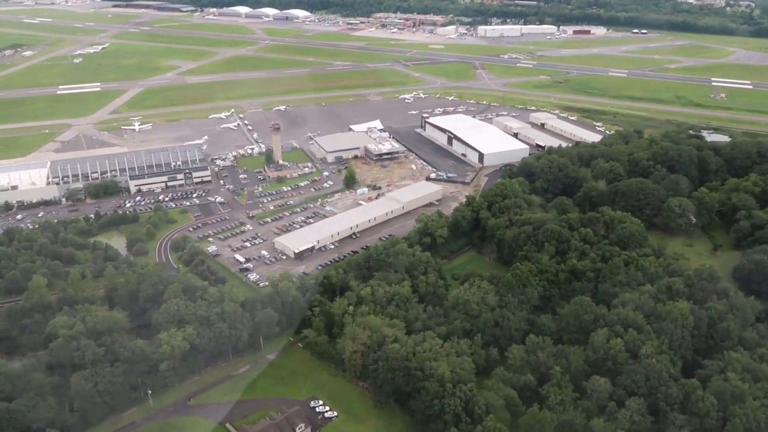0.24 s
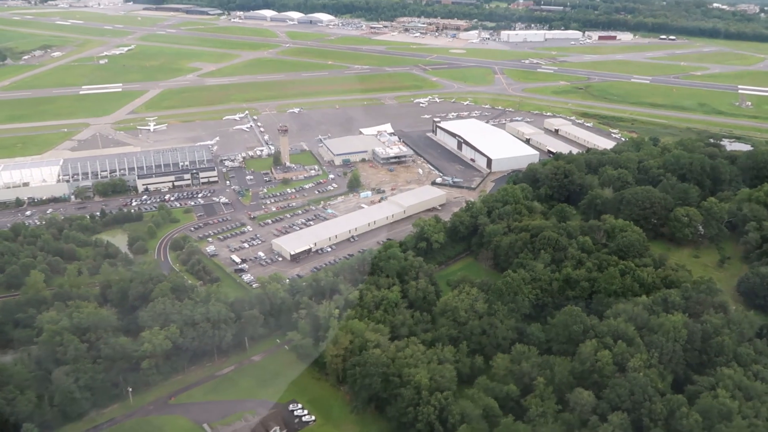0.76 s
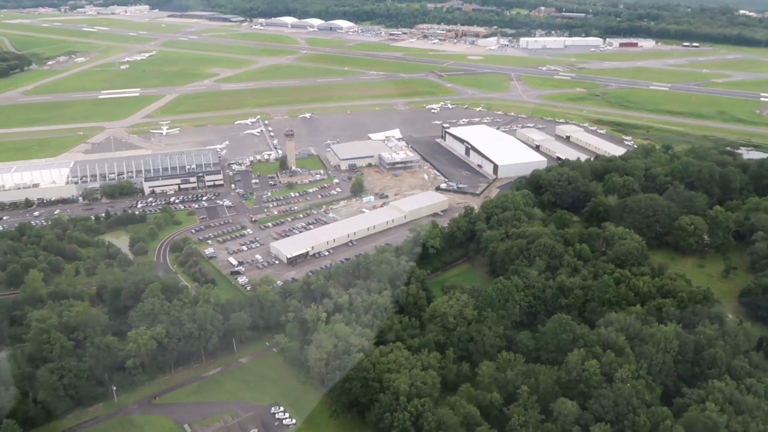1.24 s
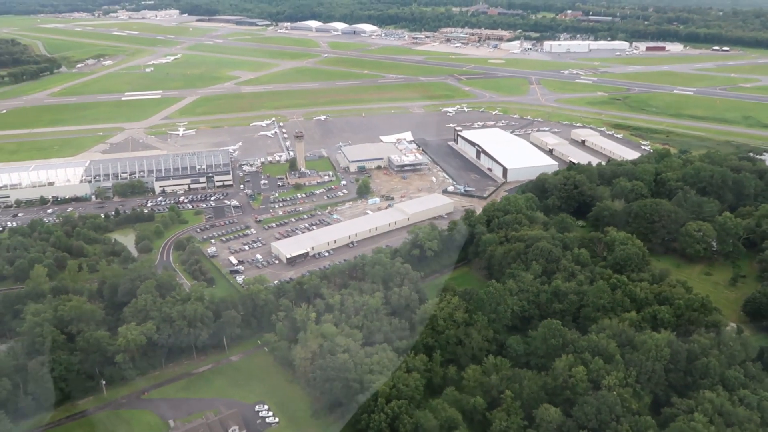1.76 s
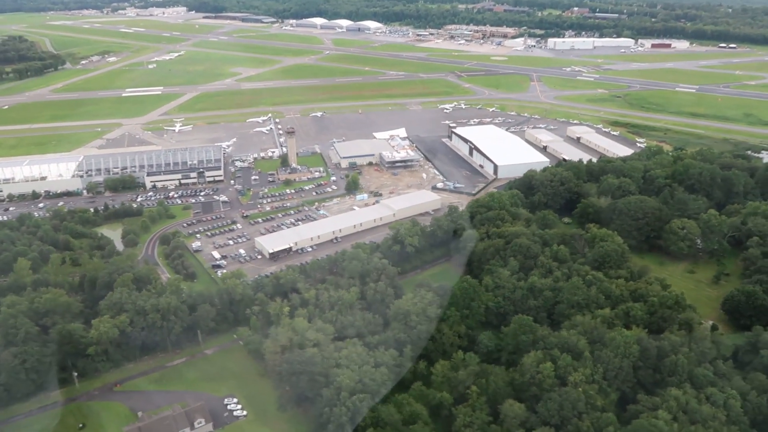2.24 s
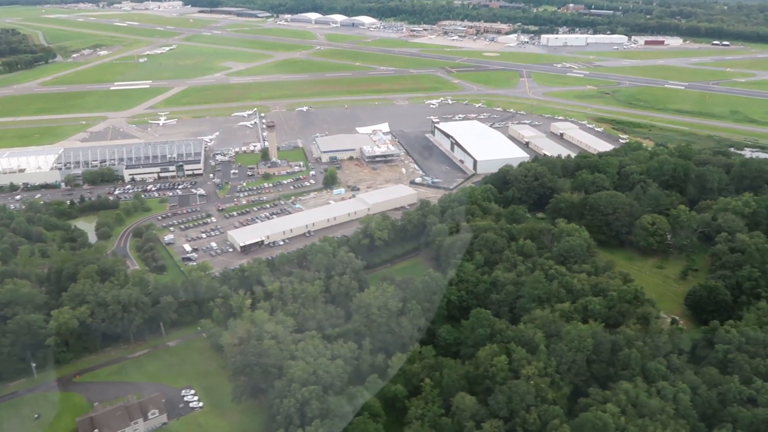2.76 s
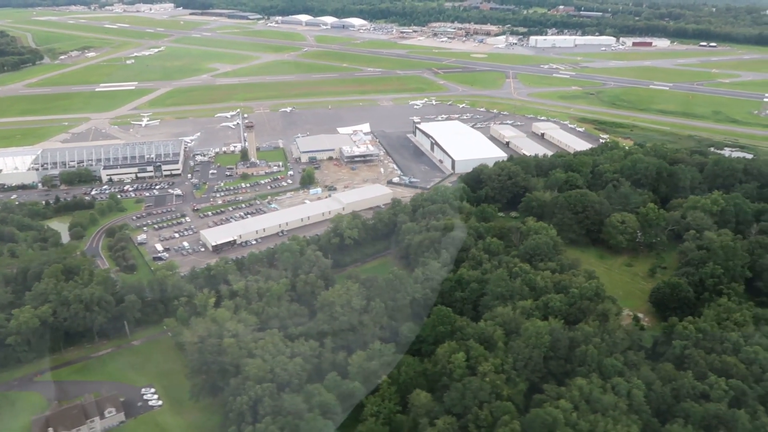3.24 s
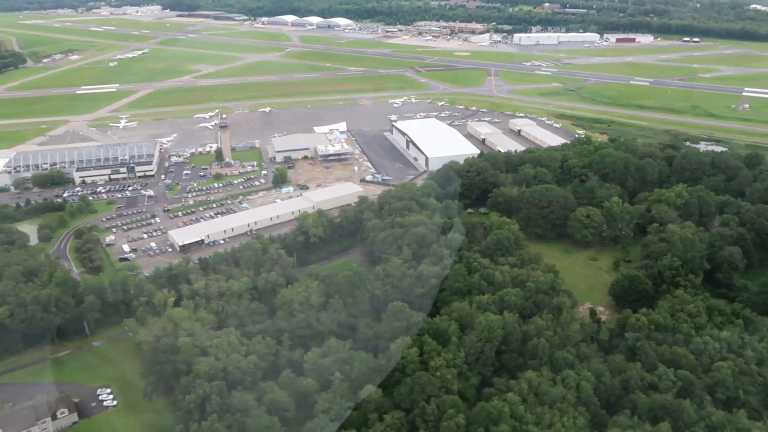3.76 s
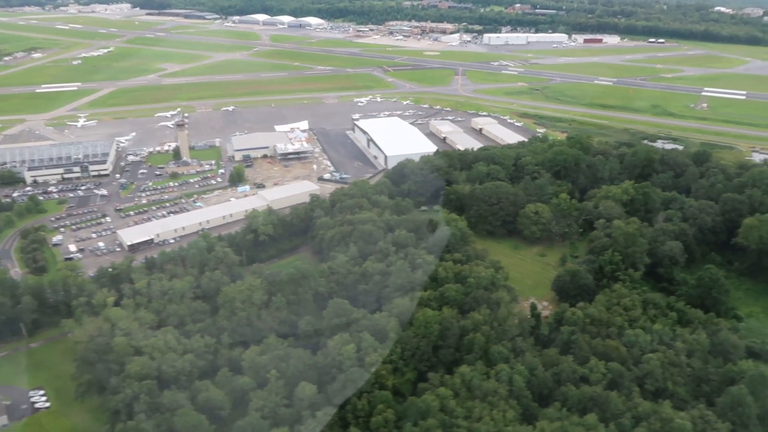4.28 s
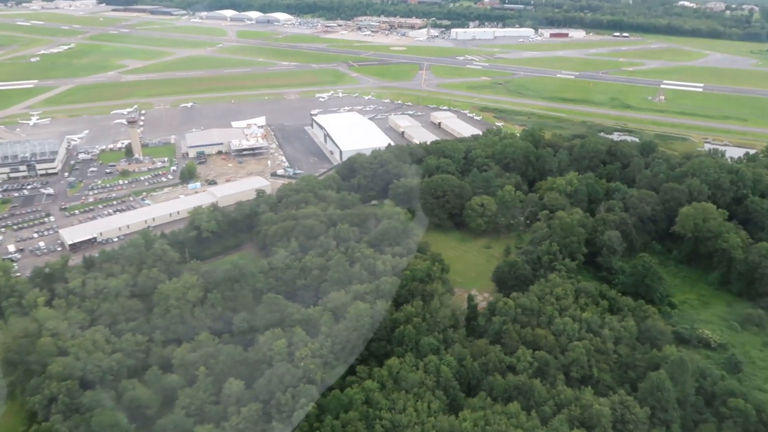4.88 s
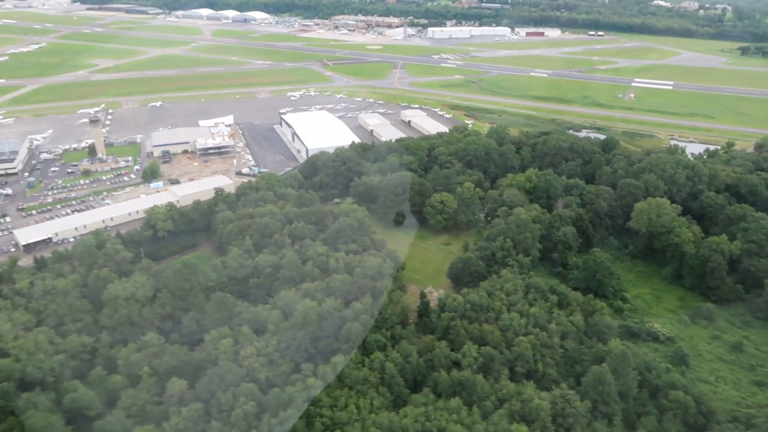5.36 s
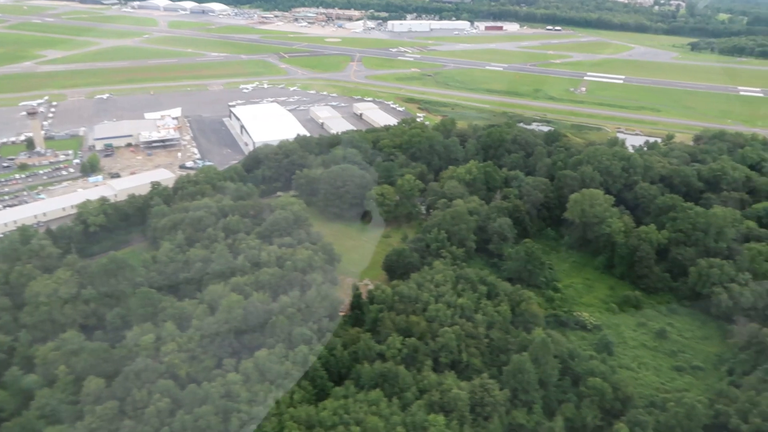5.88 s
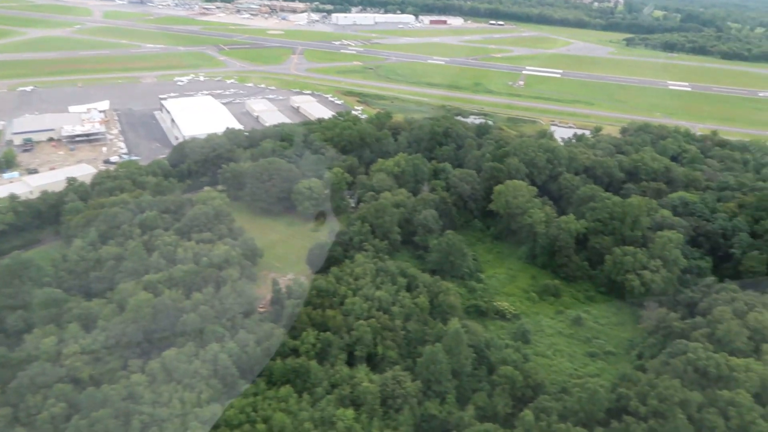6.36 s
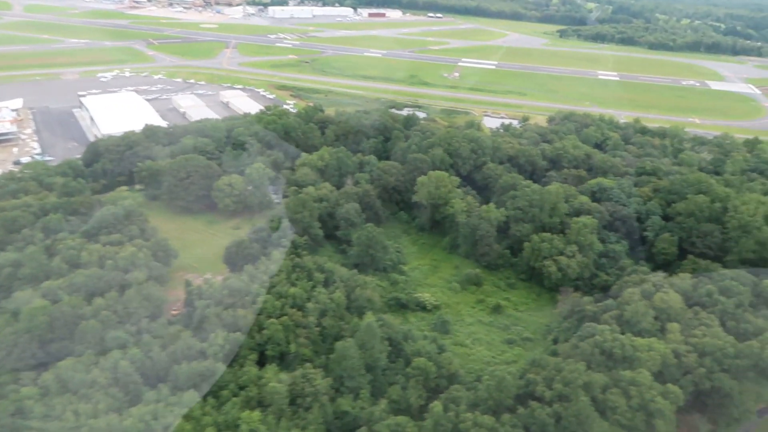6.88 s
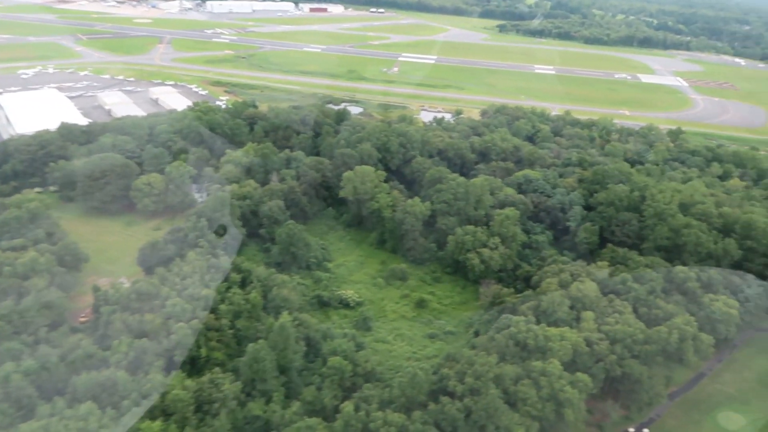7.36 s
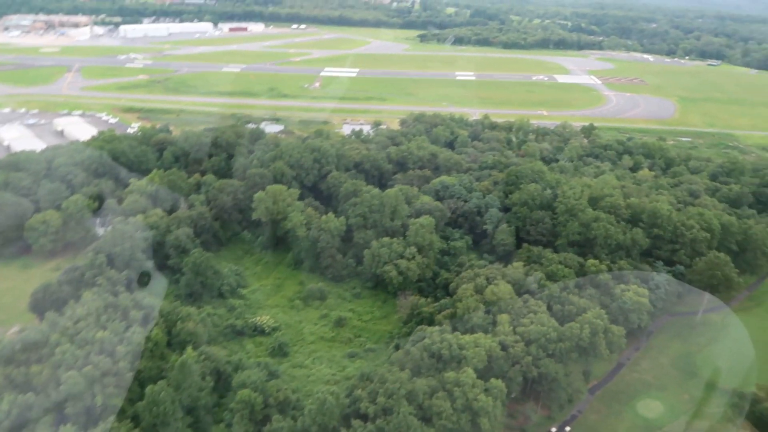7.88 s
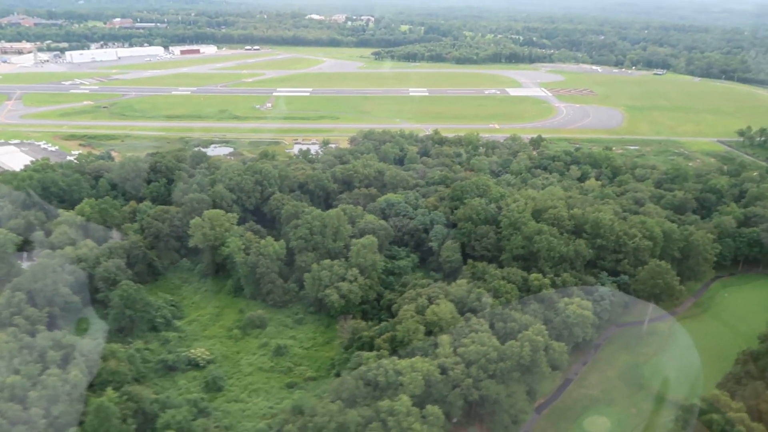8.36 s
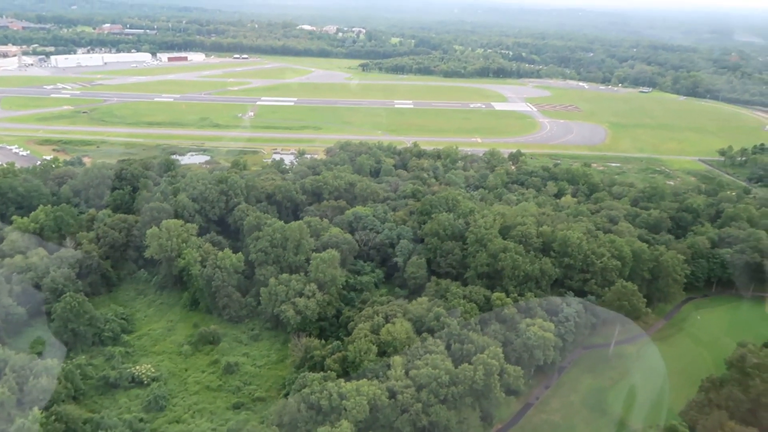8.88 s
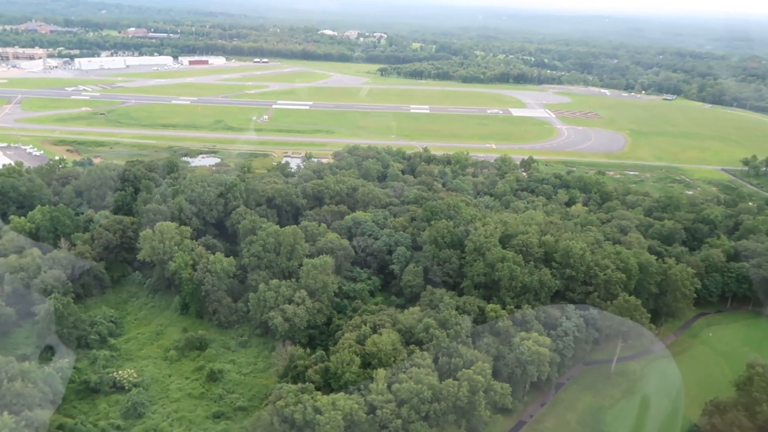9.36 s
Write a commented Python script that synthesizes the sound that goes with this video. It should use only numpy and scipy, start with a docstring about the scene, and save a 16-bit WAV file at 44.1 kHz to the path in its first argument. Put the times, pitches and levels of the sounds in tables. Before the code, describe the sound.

Close in-cabin sound of a two-blade turbine helicopter in steady flight. A heavy low drone near 100 and 160 hertz fills the space, throbbing about fourteen times a second, with broad air roar. A loose panel snaps and buzzes roughly seven times a second. Gear whine strengthens after two seconds, then fades; a higher whine rises near eight. Two soft booms of buffeting air come early and late.

```python
"""Two-blade turbine helicopter, cabin in flight

One drive shaft sets the speed of rotor thumps and slaps, tail rotor, gear meshes and gear whines: sine tones
at fixed multiples, plus clicks ringing cabin modes. The turbine whistle is a sine on its own pitch curve.
Air roars past the shell as filtered noise, swishing with every blade; buffets boom, then the level dips briefly.
A loose panel knocks once a rotor turn: a short suction pulse, then a buzz."""
import sys
import numpy as np
from scipy import signal
from scipy.fft import rfft, irfft, next_fast_len
from scipy.io import wavfile
from scipy.ndimage import uniform_filter1d

SR = 44100
rng = np.random.default_rng(int(sys.argv[2]) if len(sys.argv) > 2 else 0)


def bounce(signal):
    """Save signal as a 16-bit WAV file at the path given by the first command-line argument."""
    frames = np.transpose(np.atleast_2d(signal))
    limited = np.clip(frames, -1, 1)
    pcm = np.round(limited * 32767).astype(np.int16)
    wavfile.write(sys.argv[1], SR, pcm)


N = 424683

CRUISE_TURNS_PER_S = 100   # usual shaft speed
GEARS_START_CYCLES = .62   # phase shared by all shaft-driven tones, so their beats keep time

# Heavy buffets. Each row: boom peak time in seconds, boom peak in dB, level dip in dB, recovery in seconds.
BUFFETS = [(0.666, -11, -3, .15), (7.726, -13, -5, 0.16)]
# Light blade loading. Each row: time in seconds, share 0-1 of the light-load level change.
LIGHT_LOAD = [(0, 1), (2.4, 1), (4.4, .1), (9.63, 0.1)]


def from_db(db):
    """Decibels to gain."""
    return 10 ** (np.asarray(db) / 20)


def rms_one(x):
    """Scale to rms 1."""
    return x / np.sqrt(np.mean(x ** 2) + 1e-20)


def in_time(rows):
    """Columns of a curve table, one value per sample."""
    s, *columns = np.transpose(rows)
    return [np.interp(np.arange(N) / SR, s, column) for column in columns]


def at_hz(points, hz, axis=1):
    """Read a spectrum column on a log-frequency axis."""
    points = np.array(points)
    return np.interp(np.log(hz), np.log(points[:, 0]), points[:, axis])


def drift(rate):
    """Smooth random wander of rms about 1; a larger rate is quicker."""
    r = np.exp(-200 * np.pi * rate / SR)
    noise = rng.standard_normal(N // 100 + 1002)   # one value per 100 samples
    slow = signal.lfilter([1], [1, -2 * r, r * r], noise)[1000:]
    return np.interp(np.arange(N) / 100, np.arange(len(slow)), rms_one(slow))


def tone(cycles, level_db, pan_db=0, lead_rad=0):
    """A stereo sine on a running cycle count, level in dB rms; pan is left minus right, lead is the left's."""
    sides = np.array([[.5], [-.5]])
    gain = np.sqrt(2) * from_db(level_db + pan_db * sides)
    return gain * np.cos(2 * np.pi * cycles + lead_rad * sides)


def swell(at, sizes, hz, width_hz):
    """Clicks three times through one resonance: a soft swell and fall whose peak is near the click size."""
    out = np.full(N, 1e-18)
    out[np.clip(at, 0, N - 1)] = sizes
    r, w = np.exp(-2 * np.pi * width_hz / SR), 2 * np.pi * hz / SR
    for stage in range(3):
        out = signal.lfilter([np.sin(w)], [1, -2 * r * np.cos(w), r * r], out)
    return out * 2 * (np.e * (1 - r)) ** 2


def blows(turns, modes, spread_db, jitter_s):
    """One click per whole turn, uneven in strength and time, rings each mode; rms 1."""
    at = np.flatnonzero(np.diff(np.floor(turns)))
    chance = rng.standard_normal((len(at), 1 + len(modes)))
    at = at + (jitter_s * SR * chance[:, 0]).astype(int)
    ringing = 0
    for k, (hz, width_hz, level_db) in enumerate(modes):
        ringing = ringing + swell(at, from_db(level_db + spread_db * chance[:, k + 1]), hz, width_hz)
    return rms_one(ringing)


def stereo_air(hz):
    """Spectra of left and right air noise: coloured mid and side noise, with side level, lead and tilt by pitch."""
    # Each row: frequency in Hz, noise density in dB per Hz before tilt and swells.
    colour = [(25, -49), (45, -50), (95, -51), (125, -41), (205, -43.5), (235, -51), (400, -50.5),
              (430, -53), (1000, -65), (2400, -76.5), (3500, -77.5), (5200, -85.5), (5900, -87),
              (6500, -85), (8000, -93.5), (8600, -94), (11500, -90.5), (15000, -108)]
    # Each row: frequency in Hz, side minus mid in dB, left lead in radians.
    width = [(30, -48, 0), (60, -36, 0), (200, -34, 0), (370, -20, 0), (690, -25, 0), (1260, -12, .1),
             (2320, -10, .1), (3400, -8, .2), (4300, -5.5, .3), (5200, -1.5, 0), (5800, -3, -1.6),
             (7200, -5, -1.6), (8200, -3, -1.6), (8500, -15, 0), (14000, -16, 0)]
    # Each row: frequency in Hz, left minus right in dB.
    tilt = [(60, 0.5), (110, 0.5), (200, 0.0), (370, 1), (690, -1), (1260, 2.5), (2320, 0), (4270, 1),
            (7000, -1), (8500, 0), (14400, 0)]
    size = next_fast_len(N)
    noise = rfft(rng.standard_normal((2, size)))
    mid, side = noise * from_db(at_hz(colour, hz)) * np.sqrt(SR / 2)
    side = side * from_db(at_hz(width, hz))
    lead = np.exp(.5j * at_hz(width, hz, axis=2))
    pair = np.array([mid * lead + side, mid / lead - side])
    return pair * from_db(at_hz(tilt, hz) * [[.5], [-.5]])


def airflow(turns):
    """Noise in overlapping bands, narrower in the treble, each gusting, flickering and swelling with the blades."""
    # Gusts. Each row: time in seconds, then low roar, rush and high swish in dB about their usual level.
    gusts = [(0, -0.5, .5, 0.5), (.9, -2.1, 2, 0.5), (1.95, 1.5, 1, 0.5), (2.55, -1.5, 0.5, -1),
             (3.0, -1, 1, 0), (3.6, -1.3, 0.1, -0.5), (4.5, -2, -1, -2), (5.1, 0.2, 0, 0.5),
             (5.4, -6, -1, -0.5), (5.75, 2, 1, 1.5), (6.5, -0.5, -1, 0), (7.1, -1, -0.5, -0.5),
             (7.5, 0.5, 1.5, 1.5), (8.1, 2, 1.9, 1.5), (9.0, 0, 0.5, 0.5), (9.3, -1.5, -1.5, -1.5),
             (9.63, 0.5, 2, 0)]
    # Frequency in Hz where each gust column holds.
    gust_hz = [170, 3500, 11500]
    # Swell in each blade's wake. Each row: frequency in Hz, swing in dB, delay in rotor turns after the pass.
    wake = [(100, -1.5, 0), (180, .7, 0), (350, 1.5, 0), (800, 0, 0.05), (2520, 0.5, 0), (5600, .3, .03),
            (6400, 3.2, 0.045), (7300, 3, .04), (8300, .6, .04), (9600, .8, .1), (10800, 6, 0.13),
            (13000, 6, .105)]
    lean = .23   # the swell falls faster than it rises
    peak = .18   # the swell is narrower than the lull
    size = next_fast_len(N)
    hz = np.maximum(np.arange(size // 2 + 1) * SR / size, 1)
    pair = stereo_air(hz)
    gusts_db = np.array(in_time(gusts))
    out, together = np.zeros((2, N)), drift(26.0)
    centres_hz = 20 * 2 ** np.r_[0:8:.5, 8:9.8:.2]
    for centre_hz, mine in zip(centres_hz, np.eye(len(centres_hz))):
        share = np.interp(np.log(hz), np.log(centres_hz), mine)
        blend = [np.interp(np.log(centre_hz), np.log(gust_hz), row) for row in np.eye(len(gust_hz))]
        angle = 4 * np.pi * (turns - at_hz(wake, centre_hz, axis=2))   # two blades a turn
        shape = np.cos(angle) + lean * np.sin(2 * angle) + peak * np.cos(2 * angle)
        wake_db = at_hz(wake, centre_hz) * shape
        # the treble flickers most
        own_db = np.interp(np.log(centre_hz), np.log([3000, 11000]), [.8, 1.6])
        flicker_db = 1.26 * together + own_db * drift(29)
        out += from_db(blend @ gusts_db + wake_db + flicker_db) * irfft(pair * share, size)[:, :N]
    return out


def booms():
    """Low blows of air on the shell, each a soft swell of one resonance."""
    rise_s = .0085   # from contact to loudest
    s, peak_db = np.transpose(BUFFETS)[:2]
    at = ((s - rise_s) * SR).astype(int)
    return swell(at, from_db(peak_db), hz=182, width_hz=57)


def dips():
    """Gain that drops suddenly after each buffet and recovers smoothly."""
    after_boom_s = .0083
    s = np.arange(N) / SR - after_boom_s
    level_db = 0
    for at_s, boom_db, dip_db, back_s in BUFFETS:
        level_db = level_db + dip_db * (s > at_s) * np.exp(-np.abs(s - at_s) / back_s)
    return from_db(level_db)


def turbine_whistle():
    """A thin high sine with its own pitch curve and an unsteady level."""
    # Each row: time in seconds, frequency in Hz, level in dB rms.
    whistle = [(0, 10050, -58), (.9, 10100, -63), (1.6, 10155, -71), (2.4, 10155, -65), (3.3, 10128, -71),
               (4, 10098, -59), (4.9, 10070, -64), (5.7, 10045, -62), (6.4, 10020, -72), (7, 10008, -60),
               (7.7, 9990, -66), (8.4, 9988, -60), (9, 10030, -63), (9.63, 10075, -62)]
    hz, level_db = in_time(whistle)
    cycles = np.cumsum(hz) / SR + .1 * drift(15)
    return tone(cycles, level_db + 3.0 * drift(5))


def steady_tones(shaft):
    """Tail rotor and gear tones at fixed shaft multiples, wavering slowly in level."""
    # Each row: shaft multiple, left minus right in dB, left lead in radians.
    tones = [(.8068, 0, 0), (2, 0, 0), (2.4204, .3, 0), (3.227, -.4, -.1), (4.034, .3, 0), (4.841, .4, -.1),
             (6.534, 0, 0), (7.732, 0, 0), (9.135, .8, 0), (11.598, -.6, -.2), (12.297, 2, .2),
             (12.651, 1.5, 0), (13.35, 2.5, .2), (13.701, 4.5, .3), (16.6, 2, .2), (17.119, 3.2, .2),
             (21.786, .8, .2), (22.135, 1.3, .1), (26.705, 2, .5)]
    # Level of each tone in dB rms, same order.
    levels_db = [-40, -29.5, -34.5, -36, -41.5, -43, -46, -45, -55, -56, -51, -51, -55, -50, -60, -51, -63,
                 -62, -65]
    out = np.zeros((2, N))
    for (k, pan_db, lead_rad), level_db in zip(tones, levels_db):
        out += tone(k * shaft + GEARS_START_CYCLES, level_db + 2.0 * drift(2.9), pan_db, lead_rad)
    return out


def gear_whines(shaft):
    """Whines and side tones at shaft multiples, each on its own level curve; the close twins beat."""
    # Gear whine, beating twins, thin, high and faint whines: shaft multiple, left minus right in dB,
    # left lead in radians.
    whine = (13, 2, .14)
    twin_low = (38.7335, .6, 0)
    twin_high = (39, 1.3, .47)
    thin = (44.261, -.8, -.28)
    high = (50, 1.1, .75)
    faint_low = (10.894, .7, .2)
    faint_high = (26, 5.2, 1)
    # Faint tones around the high whine. Each row: the same three columns.
    side_tones = [(48, -.9, .8), (49, 1, .8), (51, 1, .8), (52, 1.4, 2), (53, 2.4, .6), (55.542, 0, 0)]
    # Level curves. Each row: time in seconds, level in dB rms of each tone (twins and faint pair: lower, upper).
    whine_db = [(0, -34.5), (1.2, -35), (2.0, -27.5), (3.3, -26.5), (4.6, -27.5), (6.0, -27.5), (7.6, -30),
                (8.9, -38), (9.63, -36)]
    twin_db = [(0, -50, -50), (.35, -51, -52), (.9, -51, -56), (1.3, -47, -49), (1.6, -45, -45),
               (1.9, -45, -43), (2.5, -49, -46), (3.2, -55, -48), (3.7, -67, -48), (4.8, -64, -46),
               (5.6, -67, -53), (6.4, -66, -51), (6.9, -62, -46), (7.6, -56, -47), (8.4, -54, -55),
               (9.0, -53, -56), (9.63, -52, -51)]
    thin_db = [(0, -51), (.6, -51), (1, -59), (1.5, -54), (2.3, -53), (3, -56), (4.0, -52), (5, -57),
               (5.5, -61), (6.3, -57), (6.9, -63), (7.7, -59), (8.5, -49), (9.2, -52), (9.63, -62)]
    high_db = [(0, -47), (.6, -50), (1.37, -52), (1.7, -48), (2.9, -47.5), (3.3, -51), (3.45, -66),
               (4.05, -56), (4.65, -65), (6.14, -52.5), (6.8, -54), (7.05, -61), (7.3, -51), (8.3, -40),
               (8.9, -42), (9.63, -48.5)]
    faint_db = [(0, -64, -54), (1, -55, -53), (2.2, -58, -50), (2.9, -48, -51), (4, -46, -52),
                (5.7, -44, -53), (6.9, -48, -55), (7.8, -51, -49), (8.6, -60, -57), (9.63, -55, -48)]
    side_tones_db = [(0, -63, -80, -71, -58, -76, -72), (1.2, -64, -72, -68, -62, -72, -72),
                     (2.1, -64, -64, -63, -59, -61, -70), (2.9, -68, -66, -72, -62, -61, -78),
                     (4.2, -68, -72, -77, -61, -66, -74), (5.7, -70, -75, -69, -60, -80, -62),
                     (6.9, -58, -68, -64, -60, -71, -67), (7.7, -59, -65, -69, -59, -76, -66),
                     (8.5, -60, -70, -72, -65, -80, -71), (9.63, -61, -80, -77, -62, -78, -82)]
    # Quick waver of each whine, then each side tone, in dB.
    flutters_db = [1.1, 1.1, 1.1, 2.2, .8, 1.1, 1.1, 2.5, 2.5, 2.5, 2.5, 2.5, 2.5]
    tones = [whine, twin_low, twin_high, thin, high, faint_low, faint_high, *side_tones]
    levels_db = []
    for curve in [whine_db, twin_db, thin_db, high_db, faint_db, side_tones_db]:
        levels_db += in_time(curve)
    out = np.zeros((2, N))
    for (k, pan_db, lead_rad), level_db, flutter_db in zip(tones, levels_db, flutters_db):
        out += tone(k * shaft + GEARS_START_CYCLES, level_db + flutter_db * drift(22.0), pan_db, lead_rad)
    return out


def resonant_tones(shaft, speed):
    """Shaft-driven tones whose level wanders as speed shifts them across cabin resonances."""
    # Each row: shaft multiple, left minus right in dB, left lead in radians.
    tones = [(1, .3, 0), (5.5335, 0, 0), (8.559, 1.1, 0), (1.6136, .2, 0)]
    # Resonance of each tone. Each row: peak in dB rms, best speed above cruise in turns per s, fall in dB
    # one turn per s away, slow wander in dB, load in dB per turn per s2 of speeding up, quick flutter in dB.
    response = [(-23, 0.44, 1.5, 0.6, 0.5, 1.1), (-29.5, -0.86, 2, 0.6, 1.5, 1.1),
                (-42, 0.74, 7.5, 0.6, 1, 2.5), (-24, 0.43, 1.5, 0.4, 0.5, 0.86)]
    out = np.zeros((2, N))
    gaining = uniform_filter1d(np.gradient(speed) * SR, size=SR // 2)   # turns per s2
    for (k, pan_db, lead_rad), row in zip(tones, response):
        peak_db, best, fall_db, wander_db, load_db, flutter_db = row
        level_db = peak_db - fall_db * (speed - CRUISE_TURNS_PER_S - best) ** 2
        level_db = level_db + load_db * gaining + wander_db * drift(1.0) + flutter_db * drift(15.0)
        out += tone(k * shaft + GEARS_START_CYCLES, level_db, pan_db, lead_rad)
    return out


def gear_mesh(turns):
    """Planet gear mesh with side tones from the turning rotor load; it throbs just before the blade pass."""
    # Rotor multiples.
    orders = [55, 57, 58, 59, 60]
    # Level of each in dB rms, same order.
    levels_db = [-46, -26.5, -46, -32, -47]
    lead_turns, shimmer_db = .05, 1.0
    return sum(tone(k * (turns + lead_turns), db + shimmer_db * drift(7.8), -.2, -.077)
               for k, db in zip(orders, levels_db))


def rotor_thump(turns):
    """Blade loading shakes the frame: low rotor multiples that peak together before the blade pass."""
    # Rotor multiples.
    orders = [4, 6, 8, 9, 10, 11, 12]
    # Level of each in dB rms, same order.
    levels_db = [-50, -36, -33.5, -47, -44, -48, -37.5]
    # Change of each in dB while the blades are lightly loaded.
    light_db = [-6, -10, 0, 0, 0, 0, 5]
    lead_turns = .05
    light, = in_time(LIGHT_LOAD)
    return sum(tone(k * (turns + lead_turns), db + change_db * light + .51 * drift(.63))
               for k, db, change_db in zip(orders, levels_db, light_db))


def blade_slap(turns):
    """Steady rotor multiples, beating with tail rotor and shaft tones, plus uneven cabin ringing twice a turn."""
    # Rotor multiples.
    orders = [14, 20, 22, 24, 26, 28, 30, 32]
    # Level of each in dB rms, same order.
    levels_db = [-50, -40, -38, -32, -34, -35.5, -30.5, -33]
    # Change of each in dB while the blades are lightly loaded.
    light_db = [0, -3, -4, 0, 0, 0, -12, -5]
    # Cabin modes. Each row: frequency in Hz, width in Hz, relative level in dB.
    modes = [(135, 18, -40), (204, 106, -5), (328, 52, 5), (480, 47, -40)]
    ringing_db, lead_turns = -43, .056
    light, = in_time(LIGHT_LOAD)
    steady = sum(tone(k * turns + 1 / 32, db + change_db * light + .53 * drift(3.1))
                 for k, db, change_db in zip(orders, levels_db, light_db))
    ringing = blows(2 * (turns + lead_turns), modes, spread_db=3.5, jitter_s=.00073)
    return steady + from_db(ringing_db) * ringing


def panel_knocks(turns, speed):
    """A loose panel is struck once a rotor turn: a suction snap, then a short buzz that differs every time."""
    # Knocks unlike their neighbours. Each row: time in seconds, strength change in dB.
    odd_knocks = [(0.073, 2.5), (0.369, 3), (0.518, -0.5), (1.26, 2), (2.0, 1), (2.442, -5), (3.177, 2),
                  (3.471, -6), (3.911, 5), (4.497, 1), (4.79, 1.5), (4.937, 1.5), (5.38, -1), (6.256, 2.5),
                  (6.403, 3), (7.285, -3), (7.432, 4), (8.172, 2.5), (8.468, -1), (9.359, -1.5)]
    # Band of the snap: low and high edge in Hz.
    snap_band_hz = [200, 800]
    # Panel buzzing in its frame until stopped. Each row: frequency in Hz, level in dB, length in seconds.
    buzz = [(645, -1.5, .016), (770, -14, .009), (490, -10, .007)]
    # Chance per knock: level in dB, share of pitch, share of length.
    buzz_spread = [.6, .015, .08]
    lead_turns = .0325   # ahead of the blade pass
    cruise_db, spread_db = -17, .3
    db_per_speed = -2   # per shaft turn per s: harder when the rotor slows
    snap_db, snap_s = 8, .0015
    buzz_after_s = .0009   # the buzz swings in step with the deepest point of the snap
    buzz_edge = .68   # under 1: quick start and stop

    struck = np.flatnonzero(np.diff(np.floor(turns + lead_turns)))
    chance = rng.standard_normal((len(struck), 2 + 3 * len(buzz)))
    strength_db = cruise_db + db_per_speed * (speed[struck] - CRUISE_TURNS_PER_S) + spread_db * chance[:, 0]
    for at_s, extra_db in odd_knocks:
        strength_db[np.argmin(np.abs(struck / SR - at_s))] += extra_db

    s = np.arange(SR // 40) / SR
    snap = -np.sin(np.pi * np.minimum(s / snap_s, 1)) ** 2
    snap = signal.lfilter(*signal.butter(1, snap_band_hz, "band", fs=SR), snap)
    rows = from_db(snap_db + buzz_spread[0] * chance[:, 1:2]) * snap   # one row per knock
    for k, (hz, level_db, length_s) in enumerate(buzz):
        more_db, higher, longer = (chance[:, 2 + 3 * k:5 + 3 * k] * buzz_spread).T[:, :, None]
        progress = np.minimum(s / length_s / (1 + longer), 1)
        shape = np.abs(np.sin(np.pi * progress)) ** buzz_edge
        swing = np.cos(2 * np.pi * hz * (1 + higher) * (s - buzz_after_s))
        rows = rows - from_db(level_db + more_db) * shape * swing

    out = np.zeros(N + len(s))
    out[struck[:, None] + np.arange(len(s))] = from_db(strength_db)[:, None] * rows
    return out[:N]


def scene():
    """Mix all sources; the dips spare knocks and booms."""
    # Drive shaft. Each row: time in seconds, speed in turns per s.
    shaft_speed = [(0.0, 99.61), (0.45, 99.38), (0.9, 99.31), (1.3, 99.4), (2.4, 100.21), (2.8, 100.35),
                   (3.2, 100.37), (3.6, 100.56), (4.8, 100.55), (5.6, 100.76), (6.0, 100.68), (7.2, 100.17),
                   (8.3, 99.36), (8.8, 99.3), (9.63, 99.63)]
    shaft_turns_per_rotor_turn = 14.749
    blade_at_turns = .49   # rotor turn at which a blade passes overhead
    speed, = in_time(shaft_speed)
    shaft = np.cumsum(speed) / SR
    turns = shaft / shaft_turns_per_rotor_turn - blade_at_turns
    drive = turbine_whistle() + steady_tones(shaft) + gear_whines(shaft) + resonant_tones(shaft, speed)
    rotor = gear_mesh(turns) + rotor_thump(turns) + blade_slap(turns)
    return (airflow(turns) + drive + rotor) * dips() + booms() + panel_knocks(turns, speed)


def record(dry):
    """Peaks are rounded, the deepest bass is lost, the top is cut."""
    gain_db, ceiling = .9, 1.05
    low_cut_hz, high_cut_hz = 38, 15800
    rounded = ceiling * np.tanh(from_db(gain_db) * dry / ceiling)
    wet = signal.sosfilt(signal.butter(4, low_cut_hz, "high", fs=SR, output="sos"), rounded)
    return signal.sosfilt(signal.cheby2(16, 70, high_cut_hz, fs=SR, output="sos"), wet)


dry = scene()
out = record(dry)
bounce(out)
```